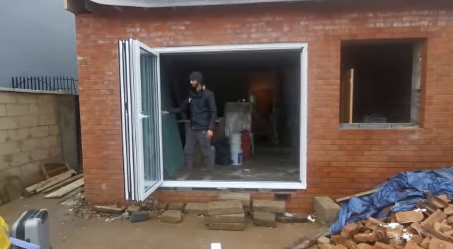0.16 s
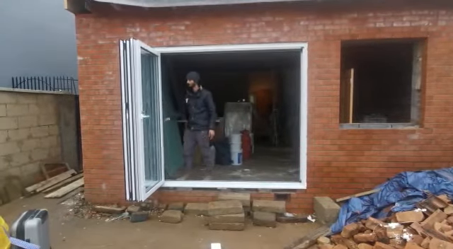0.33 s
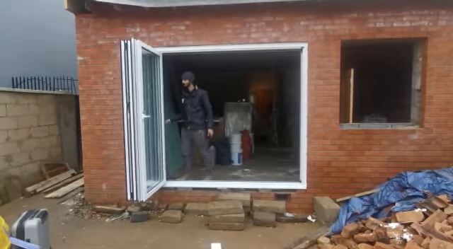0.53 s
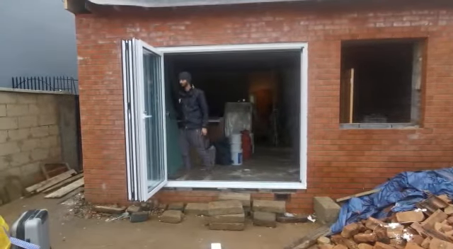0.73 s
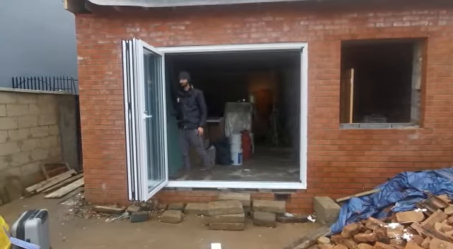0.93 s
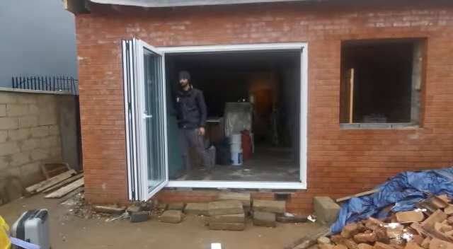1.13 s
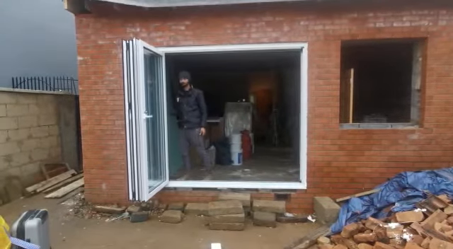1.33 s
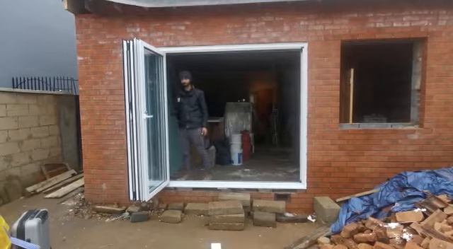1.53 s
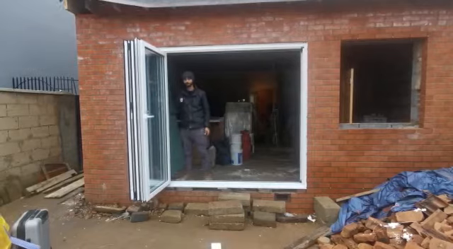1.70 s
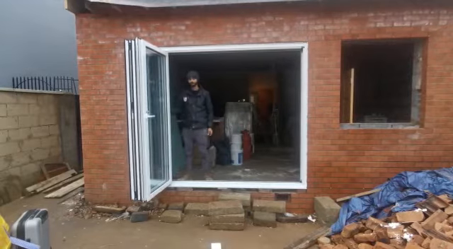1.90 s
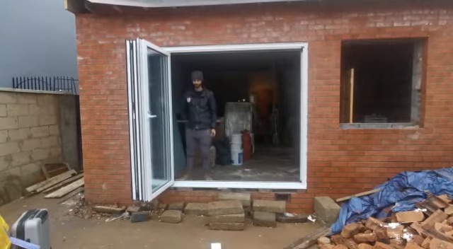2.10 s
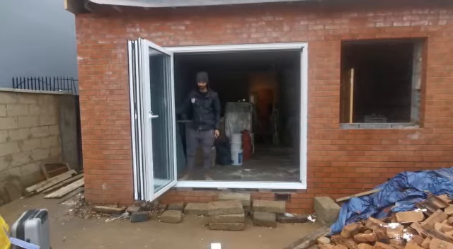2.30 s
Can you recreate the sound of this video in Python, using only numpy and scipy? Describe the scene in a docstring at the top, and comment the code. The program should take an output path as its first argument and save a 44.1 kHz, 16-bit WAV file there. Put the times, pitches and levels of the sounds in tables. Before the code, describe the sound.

A hollow door panel knocks with a quick chatter, then gritty boot scuffs and dull footfalls follow in a bare brick room, heard from the yard while low wind buffets the microphone, mostly on the left.

```python
"""Bare brick room heard from a yard: a hollow panel is knocked and chatters, boots scuff grit and thud.
Knocks and thuds are decaying modes, scuffs are clicks through sole resonances, ticks are noise bursts.
Random taps smear each sound in the room. Low noise and pressure swings buffet two microphone ports,
mostly the left, over a distant outdoor hiss of tilted noise."""
import sys
import numpy as np
from scipy import signal
from scipy.fft import rfft, irfft
from scipy.io import wavfile
from scipy.ndimage import uniform_filter1d

SR = 44100
rng = np.random.default_rng(int(sys.argv[2]) if len(sys.argv) > 2 else 0)


def transcribe(u):
    """Save the signal u as a 16-bit wav file named by the first command-line argument.

    u: samples, shape (n,) or (channels, n), limited to [-1, 1]; the rate is SR.
    q: integer samples, one column per channel.
    """
    v = np.clip(np.atleast_2d(u).T, -1, 1)
    q = np.round(v * 32767).astype(np.int16)
    wavfile.write(sys.argv[1], SR, q)


def ratio(d):
    """dB to gain"""
    e = np.asarray(d, float) / 20
    return 10 ** e


N = 103635
LEAD_SAMPLES = 4410  # run before the start, then cut

# Strikes on the hollow panel: (time [s], level [dB])
KNOCKS = [(-.075, -44.5), (0.4375, -37.5)]
# Panel modes: (frequency [Hz], level [dB], t60 [s])
PANEL_MODES = [(378, -4, .035), (440, -5, .03), (500, -7, .03), (648, -6, .04), (742, 0, .06),
               (918, -5, .04), (992, 2, .055), (1103, -1, .055), (1380, -6, .015), (1520, -7, .03),
               (1590, -10, .03), (2115, -5, .03)]
BOUNCES, BOUNCE_SPACING_S, BOUNCE_STEP_DB = 7, .01087, -.9
BOUNCE_JITTER_S, BOUNCE_SPREAD_DB = .0002, 1.5
PANEL_NEAR_DB = 7  # panel stands in the doorway: extra direct sound

# Gritty boot scrapes: (time [s], rise [s], sag [dB/s], level [dB], lift of fourth sole resonance [dB])
SCUFFS = [(-.06, 0.004, -98, -36, -1), (.953, 0.004, -56, -32.5, 8.5), (1.638, 0.025, -45.5, -31, 1.5)]
# Grit colour: (frequency [Hz], gain [dB])
GRIT_COLOUR = [(200, -9.5), (700, 0.5), (1100, -13.5), (1600, -6.5), (2600, -4), (4500, -1), (7000, 0.5),
               (10000, -2.5), (15000, -5.5)]
# Resonances of the rubbing sole: (frequency [Hz], width [Hz], gain [dB])
SOLE_RESONANCES = [(1596, 310, 10), (2142, 29, 11.5), (2298, 116, 11), (2835, 480, 3), (4400, 1500, 1)]
GRIT_PER_S, GRIT_SPREAD_DB = 2000, 2.5
SET_DOWN_SHARE = 0.64  # of full force at first touch
SLIDE_S, RELEASE_S = 0.11, 0.21

# Dull footfalls: (time [s], level [dB])
THUDS = [(1.0, -46), (1.06, -40.5), (1.676, -39.5), (1.705, -41.5), (2.205, -41)]
# Board modes under the footfalls: (frequency [Hz], level [dB], t60 [s])
BOARD_MODES = [(320, -1, .08), (470, 1, .04), (515, 5, .06), (590, 1, .05)]
THUD_SOFT_S = .005

# Rattle of hard edges: (time [s], level [dB], centre [Hz], width per filter pass [Hz], 1/e decay [s])
TICKS = [(-.004, -46.5, 1150, 1620, 0.017), (.432, -30.5, 6300, 10500, 0.034),
         (0.9514, -27.5, 4450, 1630, 0.015), (0.953, -37, 7400, 9050, 0.016),
         (0.955, -38.5, 1740, 784, 0.038)]

# Room decay: (frequency [Hz], t60 [s])
ROOM_T60 = [(500, 0.35), (2000, 0.31), (5000, 0.32), (10000, 0.13)]
DIRECT_DB = 0.5
SAME_ROOM = 0.34  # power share of the tail common to both ports

# Single pressure buffets, left port: (time [s], peak [dB], frequency [Hz], length [cycles])
BUFFETS = [(0.206, -19.5, 59.5, 0.55), (0.271, -17, 89, 0.68), (0.579, -24.5, 43.5, 3.1),
           (0.716, -17.5, 69.4, 0.47), (1.026, -15, 139, 0.68), (1.147, -26, 59, 1.7),
           (1.299, -20, 122, 0.99), (1.373, -31, 70, 0.7), (1.396, -18, 88.5, 2.2),
           (1.409, -13.5, 165, 1.65), (1.421, -11.5, 132, 2.3), (1.445, -12.5, 84.5, 1.12),
           (1.503, -16, 56, 1.16), (1.628, -15, 62, 0.48), (1.898, -24, 71, 0.9)]
# Wind strength at each port: (time [s], level [dB])
LEFT_WIND = [(0, -58), (.17, -44), (.21, -27.5), (.32, -27), (.39, -43.5), (.46, -34), (.58, -34.5),
             (.68, -36.5), (.8, -33.5), (.93, -33), (.99, -45), (1.05, -29), (1.2, -27), (1.26, -42),
             (1.34, -27), (1.42, -21.5), (1.52, -32.5), (1.62, -29), (1.72, -35), (1.93, -30.5),
             (2.03, -52), (2.35, -47)]
RIGHT_WIND = [(0, -49.5), (.15, -53), (.6, -54), (.72, -43.5), (.82, -55), (1.12, -49), (1.25, -52),
              (1.45, -56), (1.51, -26), (1.58, -29.5), (1.67, -26.5), (1.74, -40), (1.83, -60), (2.35, -56)]
# Wind spectrum when calm, and in strong gusts: (frequency [Hz], gain [dB])
CALM_SPECTRUM = [(30, 1.5), (60, 2), (100, -7.5), (160, -18), (250, -30), (400, -31.5), (800, -99)]
STRONG_SPECTRUM = [(30, -3.5), (120, 1), (300, -20.5), (800, -90)]
CALM_DB, STRONG_DB = -28, -26  # strengths between which the spectra blend
LUMP_DB, LUMP_S = 2, 0.021

# Tilt of the hiss by distant low town noise: (frequency [Hz], gain [dB])
MURMUR = [(200, 5), (600, 2), (7000, 1), (11000, -1)]
# Left-right likeness of the hiss: (frequency [Hz], likeness [0..1])
SAME_AIR = [(100, 0.91), (1000, 0.9), (4000, 0.21), (12000, 0.04)]
AIR_DB, AIR_PATCH_DB = -42, .7  # before port colour
THIN_HZ, THIN_WIDTH_HZ, THIN_DB = 3360, 68, 7.5  # thin steady hiss band, left port

# Colour of each microphone port: (frequency [Hz], gain [dB])
LEFT_PORT = [(100, 9), (500, 3), (1100, 5.5), (1600, -2.5), (2500, -5.5), (3100, -0.5), (3800, -7),
             (5000, -7), (6500, -13), (9000, -22.5), (11000, -32.5), (15000, -29.5)]
RIGHT_PORT = [(100, -1.5), (500, 3), (2000, 6), (2600, -4), (3300, -3.5), (3750, -13), (4500, -4),
              (6500, -15.5), (7000, -8.5), (8000, -24), (9000, -27), (10000, -18), (12000, -26),
              (14500, -27)]
RIGHT_LATE_SAMPLES = 22


def evened(x):
    """Scales to rms 1."""
    return x / np.sqrt(np.mean(x ** 2) + 1e-20)


def read(points, hz):
    """Reads a table on a log-frequency axis."""
    f, value = np.transpose(points)
    return np.interp(np.log(hz + 1), np.log(f + 1), value)


def colour(x, points):
    """Minimum-phase filter from a dB table."""
    hz = abs(np.fft.fftfreq(4096, 1 / SR))
    log_gain = np.log(ratio(read(points, hz)))
    spectrum = np.exp(np.conj(signal.hilbert(log_gain)))
    taps = np.fft.ifft(spectrum).real[:2048]
    return signal.oaconvolve(x, taps)[:len(x)]


def resonate(x, hz, width_hz):
    """Single band-pass resonance, unity gain at its centre."""
    return signal.lfilter(*signal.iirpeak(hz, hz / width_hz, SR), x)


def add(mix, time_s, sound):
    """Mixes a sound in at its time."""
    part = mix[LEAD_SAMPLES + round(time_s * SR):][:len(sound)]
    part += sound[:len(part)]


def ring(modes, strengths):
    """Sum of exponentially decaying sines, each mode scaled by its strength."""
    t = np.arange(SR // 3) / SR
    return sum(strength * ratio(db - 60 * t / t60) * np.sin(2 * np.pi * hz * t)
               for strength, (hz, db, t60) in zip(strengths, modes))


def blows(times_s, levels_db, modes, soft_s):
    """Each blow excites the modes a little differently; soft contact rounds the onset."""
    out = np.zeros(N + LEAD_SAMPLES)
    t = np.arange(SR // 3) / SR
    onset = 1 - np.exp(-t / soft_s)
    strengths = ratio(2.0 * rng.standard_normal((len(times_s), len(modes))))
    for time_s, db, strength in zip(times_s, levels_db, strengths):
        add(out, time_s, ratio(db) * ring(modes, strength) * onset)
    return out


def panel():
    """Each knock is a quick, slightly uneven run of bounces that tend to weaken."""
    bounce = np.arange(BOUNCES)[:, None]
    late, loud = rng.standard_normal((len(KNOCKS), BOUNCES, 2)).T
    time_s, db = np.transpose(KNOCKS)
    spacing_s = BOUNCE_SPACING_S + BOUNCE_JITTER_S * late / np.sqrt(bounce + 1)
    times_s = time_s + bounce * spacing_s
    levels_db = db + bounce * BOUNCE_STEP_DB + BOUNCE_SPREAD_DB * loud
    return blows(times_s.T.ravel(), levels_db.T.ravel(), PANEL_MODES, soft_s=0.0015)


def scuffs():
    """Dense grit clicks under a sliding sole excite the sole's resonances."""
    out = np.zeros(N + LEAD_SAMPLES)
    t = np.arange(SR // 2) / SR
    for time_s, rise_s, sag_db_per_s, db, lift_db in SCUFFS:
        hit, size, sign = rng.random((len(t), 3)).T
        clicks = hit < GRIT_PER_S / SR
        grit = clicks * ratio(-GRIT_SPREAD_DB * np.log(size + 0.02)) * np.sign(sign - .5)
        rung = grit.copy()
        for i, (hz, width_hz, gain_db) in enumerate(SOLE_RESONANCES):
            rung += ratio(gain_db + lift_db * (i == 3)) * resonate(grit, hz, width_hz)
        rung = colour(rung, GRIT_COLOUR)
        force = np.minimum(SET_DOWN_SHARE + (1 - SET_DOWN_SHARE) * t / rise_s, 1)
        release = np.exp(-np.maximum(t - SLIDE_S, 0) / RELEASE_S)
        stroke = force * ratio(sag_db_per_s * t) * release
        add(out, time_s, ratio(db) * stroke * evened(rung))
    return out


def thuds():
    """Soft-edged footfalls ring the board modes."""
    return blows(*np.transpose(THUDS), BOARD_MODES, THUD_SOFT_S)


def ticks():
    """Hard edges meet: short noise bursts, band-passed twice, decaying exponentially."""
    out = np.zeros(N + LEAD_SAMPLES)
    t = np.arange(SR // 5) / SR
    for time_s, db, hz, width_hz, decay_s in TICKS:
        burst = rng.standard_normal(len(t))
        for _ in range(2):
            burst = resonate(burst, hz, width_hz)
        add(out, time_s, ratio(db) * evened(burst) * np.exp(-t / decay_s))
    return out


def room(x):
    """Direct sound plus sparse random taps that die by band, partly shared by both ports."""
    taps = np.zeros((3, SR))
    at = np.arange(120, SR - 20, 20)
    at = at + rng.integers(0, 20, (3, len(at)))
    np.put_along_axis(taps, at, rng.choice([-1., 1.], at.shape), 1)
    hz, t, z = signal.stft(taps, SR, nperseg=256)
    decay = ratio(-60 * t / read(ROOM_T60, hz)[:, None])
    tail = signal.istft(z * decay, SR, nperseg=256)[1]
    tail = np.sqrt(SAME_ROOM) * tail[0] + np.sqrt(1 - SAME_ROOM) * tail[1:]
    tail = tail / np.linalg.norm(tail[0])
    wet = signal.fftconvolve(x[None], tail, axes=1)[:, :len(x)]
    return wet + ratio(DIRECT_DB) * x


def buffets():
    """Single eddies strike the port: short pressure swings, cosines under a sech envelope."""
    t = np.arange(N) / SR
    out = np.zeros(N)
    for time_s, db, hz, cycles in BUFFETS:
        swing = np.cos(2 * np.pi * hz * (t - time_s))
        spread = np.clip((t - time_s) * hz / cycles * 3.47, -50, 50)
        out += ratio(db) * swing / np.cosh(spread)
    return out


def wind(strength):
    """Lumpy low turbulence at one port; its spectrum shifts as it strengthens."""
    level_db = np.interp(np.arange(N) / SR, *np.transpose(strength))
    raw, lumps = rng.standard_normal((N, 2)).T
    hz = np.fft.rfftfreq(N, 1 / SR)
    calm, strong = (evened(irfft(rfft(raw) * ratio(read(spectrum, hz)), N))
                    for spectrum in (CALM_SPECTRUM, STRONG_SPECTRUM))
    share = np.clip((level_db - CALM_DB) / (STRONG_DB - CALM_DB), 0, 1)
    width = int(LUMP_S * SR)
    lumps = uniform_filter1d(uniform_filter1d(lumps, width), width)
    lumps = ratio(LUMP_DB * evened(lumps))
    return ratio(level_db) * evened(lumps) * ((1 - share) * calm + share * strong)


def air():
    """Distant outdoor hiss: tilted noise, partly alike at both ports, with faint drifting patches."""
    frames = (N + LEAD_SAMPLES) // 256 + 5
    hz = np.fft.rfftfreq(1024, 1 / SR)
    a, b, c, d, patches = rng.standard_normal((frames, 513, 5)).T
    for axis in (0, 1):  # frequency, time
        patches = uniform_filter1d(patches, size=12, axis=axis)
    patches = evened(patches)
    same = read(SAME_AIR, hz)[:, None]
    left = a + 1j * b
    right = same * left + np.sqrt(1 - same ** 2) * (c + 1j * d)
    z = np.array([left, right]) * ratio(read(MURMUR, hz)[:, None] + AIR_PATCH_DB * patches)
    hiss = signal.istft(z, nperseg=1024, noverlap=768)[1][:, :N + LEAD_SAMPLES]
    hiss = ratio(AIR_DB) * evened(hiss)
    hiss[0] += ratio(THIN_DB) * resonate(hiss[0], THIN_HZ, THIN_WIDTH_HZ)
    return hiss


def scene():
    """Room sounds and hiss reach the right port a little late; wind acts on each port alone."""
    knocks = panel()
    inside = knocks + thuds() + scuffs() + ticks()
    left, right = room(inside) + ratio(PANEL_NEAR_DB) * knocks + air()
    left = colour(left, LEFT_PORT)[LEAD_SAMPLES:]
    right = colour(right, RIGHT_PORT)[LEAD_SAMPLES - RIGHT_LATE_SAMPLES:-RIGHT_LATE_SAMPLES]
    return np.array([left + wind(LEFT_WIND) + buffets(), right + wind(RIGHT_WIND)])


def roll_off(x):
    """The treble ends steeply here."""
    return signal.sosfilt(signal.butter(12, 15610, fs=SR, output="sos"), x)


def record(dry):
    """Delivers the finished two-port mix."""
    return roll_off(dry)


dry = scene()
out = record(dry)
transcribe(out)
```